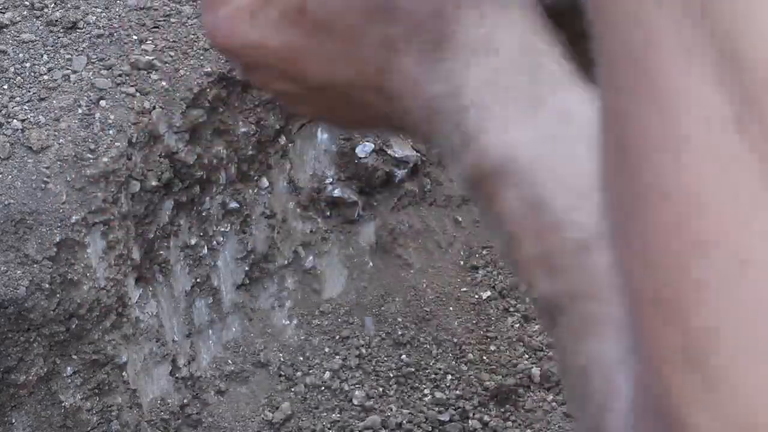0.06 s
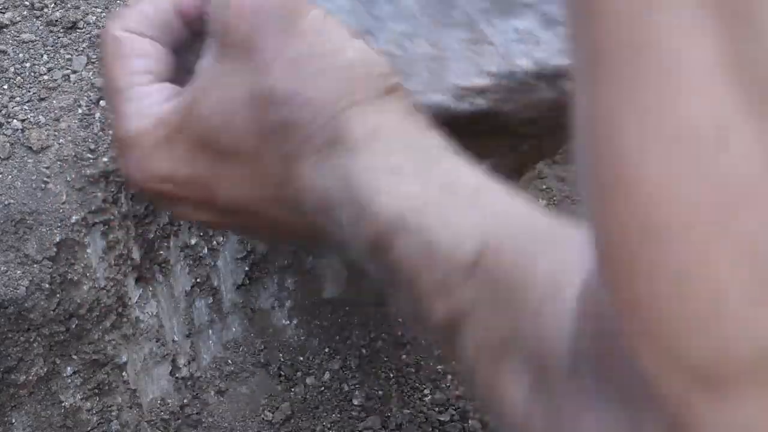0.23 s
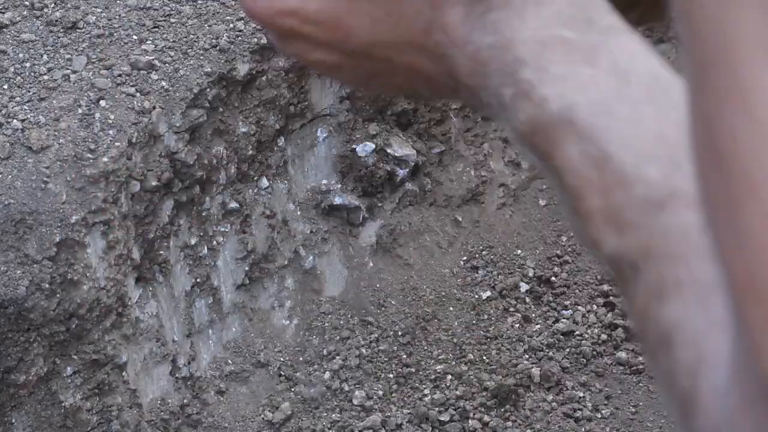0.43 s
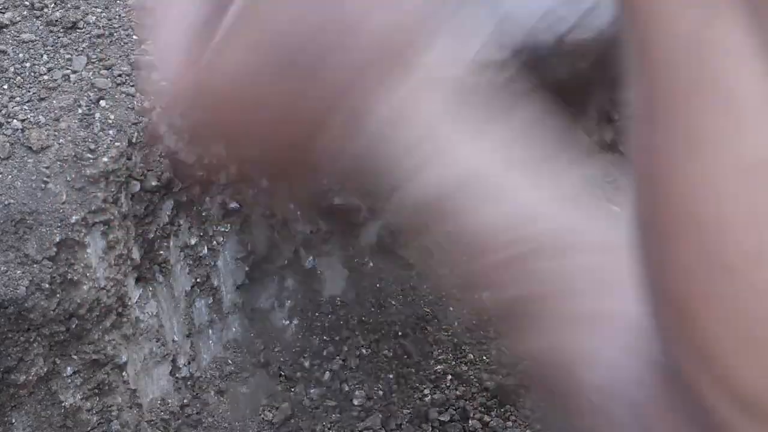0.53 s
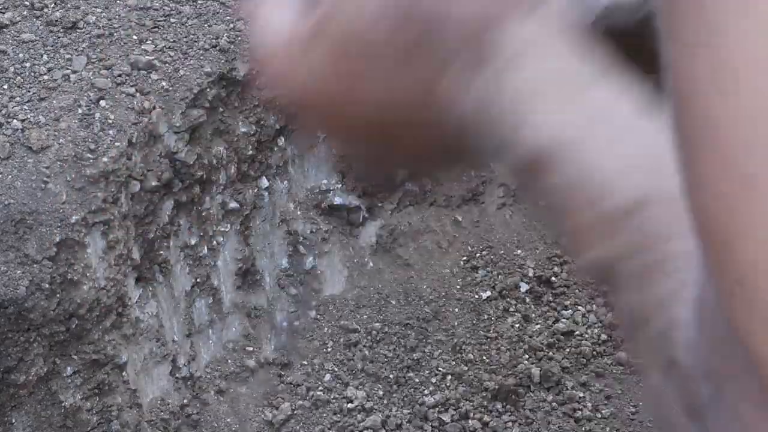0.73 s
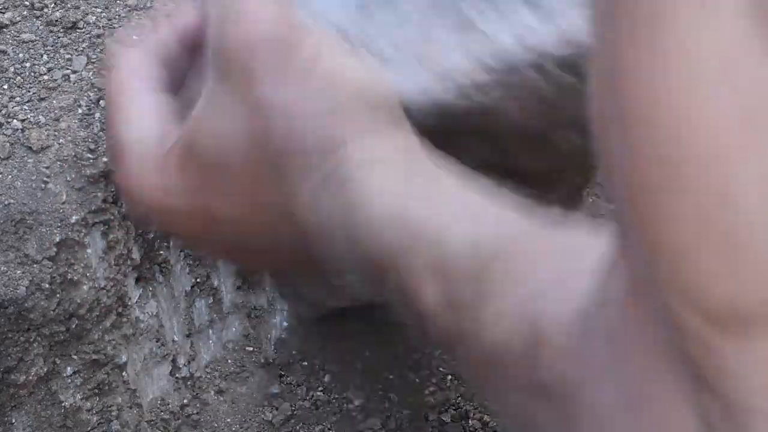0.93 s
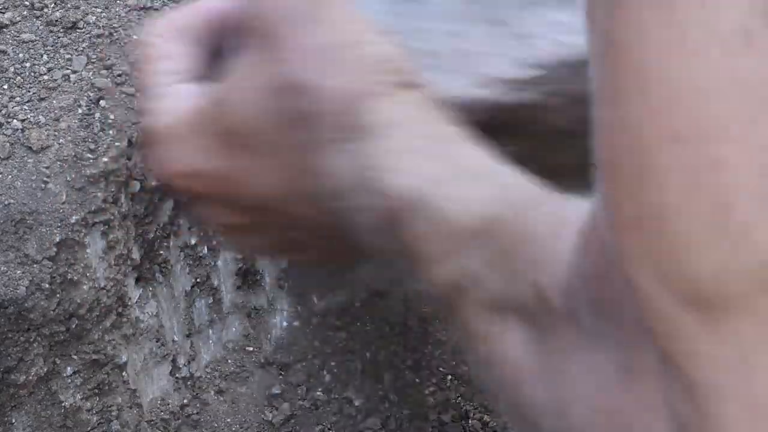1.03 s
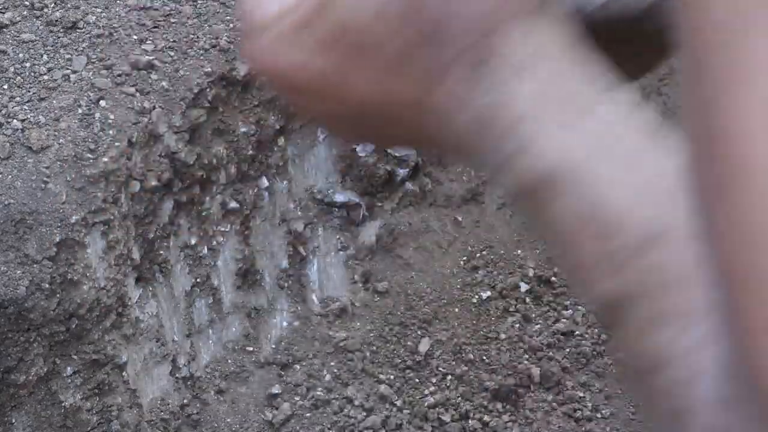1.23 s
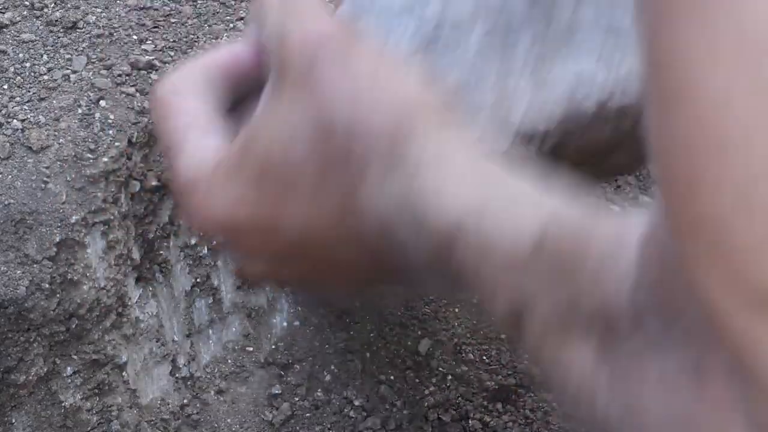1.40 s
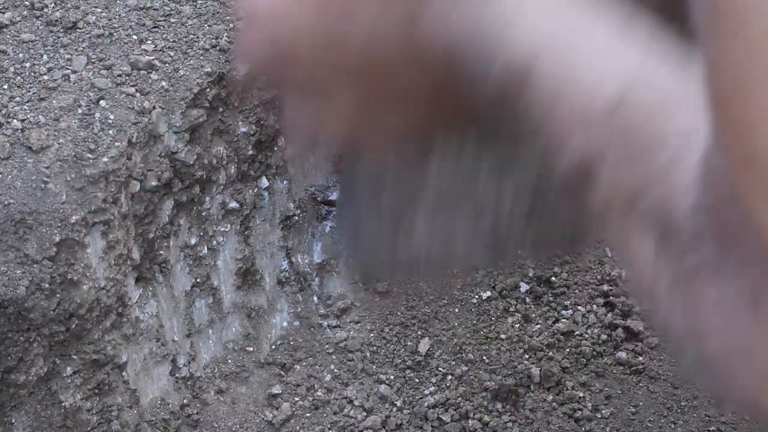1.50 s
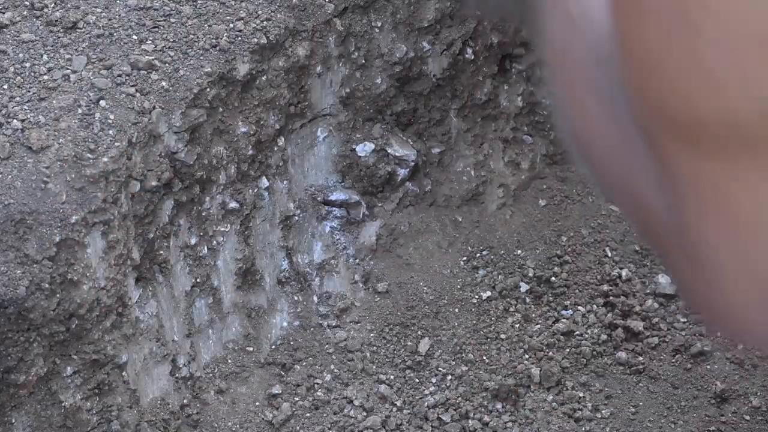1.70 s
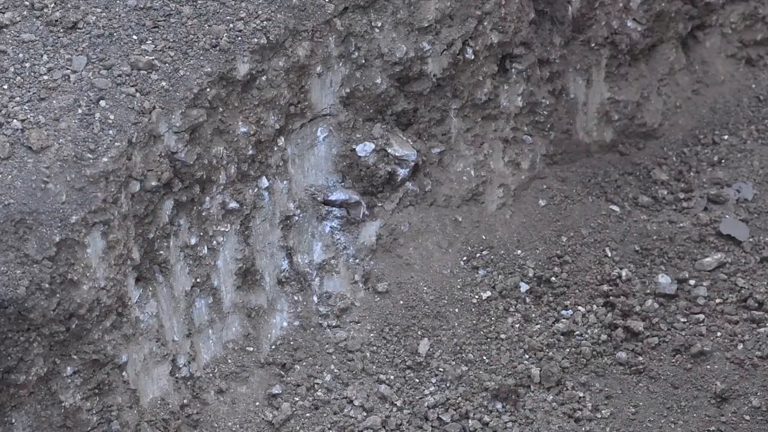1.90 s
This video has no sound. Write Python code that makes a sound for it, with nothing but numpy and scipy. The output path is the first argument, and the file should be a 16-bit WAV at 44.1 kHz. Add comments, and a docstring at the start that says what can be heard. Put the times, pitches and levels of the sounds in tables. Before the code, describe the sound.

A hand-held stone pounds hard, gravelly earth four times at a steady pace, close by outdoors. Each blow crunches and lands with a dull knock and low thud, followed by a faint patter of loose grit.

```python
"""The low shudder of an earlier blow dies away, leaving quiet air and a faint rumble. Close by, a
hand-held stone is pounded four times into hard, gravelly earth. Each blow crushes grit and cracks
single stones, then seats with a dull knock and a low shudder of the ground. Loose grit and pebbles
land afterwards, and a soft scuff leads into the next blow. At the end the stone is lifted away with
a faint scrape."""
import sys
import numpy as np
from scipy import signal
from scipy.fft import rfft, irfft
from scipy.io import wavfile

SR = 44100
rng = np.random.default_rng(int(sys.argv[2]) if len(sys.argv) > 2 else 0)


def persist_wave(psi):
    """Save psi, clipped to +-1, as 16-bit WAV."""
    counts = np.round(np.clip(psi, -1, 1) * 32767).astype(np.int16)
    wavfile.write(sys.argv[1], SR, np.atleast_2d(counts).T)


N = 85995

# The stone bites into gravel. Each row: start in seconds, crunch level in dB, crushing time and t60
# in seconds, low-mid, presence and treble EQ in dB, jolt level in dB.
BLOWS = [(0.1996, -26, 0.0031, 0.053, 1, -1, 1.5, -24), (0.596, -29, 0.025, .035, 0, 4, 0.5, -22),
         (0.9712, -17, 0.0029, 0.032, 3.5, 7, -1, -24), (1.3576, -18.5, 0.0032, 0.032, -4, 2, -1, -35)]
# The ground takes the weight. Each row: start in seconds, boom, thump and upper thump EQ in dB,
# a factor on the ring time, left-minus-right balance in dB.
THUDS = [(0.203, 7.5, -0.5, -1.5, 1.24, -2), (0.6242, -1.5, 5.5, -6.5, 1.08, 0.5),
         (0.9826, 0.5, 3, -5.5, 1.1, 1), (1.3642, 8.5, -4, -3.5, 1.165, 0)]

TIME = np.arange(N) / SR
BIN_HZ = np.fft.rfftfreq(4096, 1 / SR)


def undb(db):
    return 10 ** (np.asarray(db) / 20)


def on_log(hz, points):
    """Read an EQ curve of (Hz, dB) points on a log-frequency axis."""
    f, db = np.array(points, float).T
    return np.interp(np.log(np.maximum(hz, 1)), np.log(f), db)


def colour(x, db):
    """Minimum-phase EQ of unit power: db sets only the shape, one value for each of BIN_HZ."""
    cepstrum = irfft(np.log(undb(db)))
    half = len(cepstrum) // 2
    cepstrum[1:half] *= 2
    cepstrum[half + 1:] = 0
    impulse = irfft(np.exp(rfft(cepstrum)))
    return signal.fftconvolve(x, impulse / np.sqrt(np.sum(impulse ** 2)))[:N]


def since(start):
    return np.maximum(TIME - start, 0)


def burst(start, rise, hold, t60):
    """Linear attack; the exponential release begins hold seconds after the start."""
    t = since(start)
    return np.minimum(t / rise, 1) * np.exp(-np.log(1000) * np.maximum(t - hold, 0) / t60)


def swells(rows):
    """Bell-shaped fades. Each row: centre and half length in seconds, peak level in dB."""
    return sum(undb(db) * np.exp(-.5 * ((TIME - centre) / half) ** 2) for centre, half, db in rows)


def grains(per_s, spread_db):
    """Random clicks of uneven size, rms 1."""
    size = undb(spread_db * np.minimum(rng.exponential(size=N), 4)) * rng.choice([-1, 1], N)
    clicks = size * (rng.random(N) < per_s / SR)
    return clicks / clicks.std()


def stereo_noise(eq, likeness):
    """Coloured noise, from fully wide at likeness 0 to mono at 1."""
    common = np.sqrt(likeness) * rng.standard_normal(N)
    channels = [common + np.sqrt(1 - likeness) * rng.standard_normal(N) for _ in range(2)]
    return np.array([colour(noise, on_log(BIN_HZ, eq)) for noise in channels])


def air_and_rumble():
    """The low shudder of an earlier blow dies away at the start, leaving quiet air and a faint rumble."""
    # Tone of the air and of the rumble. Each row: frequency in Hz, relative level in dB.
    air_eq = [(100, 1.5), (300, -6), (450, -7), (1000, -14.5), (2000, -18), (3300, -21.5), (9000, -23.5),
              (16000, -25)]
    rumble_eq = [(15, -27.5), (30, -6), (52, 5.5), (110, -17.5), (200, -26), (500, -46.5), (2000, -78.5)]
    # The earlier blow's tail sinks to a faint rumble. Each row: time in seconds, level in dB.
    rumble_levels = [(0, -38), (.15, -55.5), (.5, -59.5), (.9, -58.5), (1.551, -58), (1.722, -64),
                     (1.95, -71.5)]
    rumble_gain = undb(np.interp(TIME, *np.array(rumble_levels).T))
    air = undb(-62.5) * stereo_noise(air_eq, likeness=0.22)
    return air + rumble_gain * stereo_noise(rumble_eq, likeness=0)


def scuffs():
    """The stone scrapes softly as it is moved between blows and lifted away."""
    # The hand's moves. Each row: centre and half length in seconds, level in dB.
    moves = [(.54, 0.016, -60.5), (.918, 0.0073, -61.5), (1.308, 0.0063, -59), (1.885, 0.01, -62)]
    # Tone of the scrape. Each row: frequency in Hz, relative level in dB.
    scuff_eq = [(100, -9), (350, 0.5), (700, -16.5), (1300, -14), (3000, -26), (8000, -35)]
    return colour(swells(moves) * rng.standard_normal(N), on_log(BIN_HZ, scuff_eq))


def loose_grit():
    """Loose grit lands in small showers of dense clicks."""
    # The showers. Each row: centre and half length in seconds, level in dB.
    showers = [(0.288, 0.047, -65.5), (0.35, 0.0061, -64.5), (0.666, 0.021, -59), (0.997, 0.017, -58),
               (1.084, 0.017, -62), (1.437, 0.019, -64.5), (1.498, 0.014, -63.5), (1.81, 0.12, -69.5),
               (1.886, 0.0095, -66.5)]
    # Tone of the landing grit. Each row: frequency in Hz, relative level in dB.
    grit_eq = [(200, -11.5), (1200, -9.5), (1750, 2), (2300, 0.5), (3500, -11), (5500, -8.5), (11000, -9),
               (16000, -18)]
    return colour(swells(showers) * grains(per_s=4900, spread_db=2), on_log(BIN_HZ, grit_eq))


def pebbles():
    """Single pebbles land, each with a noisy tick and a very brief ring."""
    # The landings. Each row: start in seconds, level in dB, pitch in Hz, t60 in seconds.
    landings = [(.2602, -61, 8500, 0.01), (0.2827, -57.5, 9700, 0.0071), (0.3073, -54, 1660, .03),
                (0.307, -59.5, 7600, 0.016), (0.337, -78, 1850, 0.074), (.6617, -48, 2060, 0.024),
                (.674, -47.5, 6170, 0.0073), (.696, -59.5, 3300, 0.016), (1.448, -55, 1470, 0.042),
                (1.7449, -54, 1806, 0.031), (1.777, -61.5, 1840, 0.03), (1.877, -57.5, 2380, 0.06)]
    out = 0
    for start, db, hz, t60 in landings:
        octaves_off = np.log2(np.maximum(BIN_HZ, 1) / hz)
        band_db = -10 * np.log10(1 + (octaves_off / 0.45) ** 4)
        fade = burst(start, rise=0.00043, hold=0.0004, t60=t60)
        tick = colour(rng.standard_normal(N) * fade, band_db)
        ring = np.sin(2 * np.pi * hz * since(start)) * fade
        out += undb(db) * (tick + ring)
    return out


def soil():
    """Packed earth rumbles briefly after each blow: the diffuse part of the thud."""
    # Tone of the earth. Each row: frequency in Hz, relative level in dB.
    soil_eq = [(30, -17.5), (60, 2), (160, 4), (260, -10), (420, -18.5), (700, -28), (2000, -54.5)]
    fade = sum(burst(start, rise=.004, hold=0.024, t60=0.19 * length) for start, *_, length, _ in THUDS)
    return undb(-33) * fade * stereo_noise(soil_eq, likeness=0.44)


def shudder():
    """Low modes of the ground and what stands on it swell and die, differently left and right."""
    # The modes. Each row: frequency in Hz, base level in dB, base t60 in seconds,
    # left-minus-right balance in dB, phase lead of the left side in radians.
    modes = [(43.9, -33, 0.44, -2.5, 2.2), (61.9, -19.5, 0.35, -3.5, 3.1), (98.7, -33.5, 0.42, 7, 1.6),
             (112.65, -14.5, 0.23, -2.5, 1.9), (144.8, -8.5, 0.11, -3, 0.61),
             (175.75, -21, 0.17, -3.5, 0.4), (218.5, -32, 0.13, 7.5, .4), (245.5, -39, 0.13, 17.5, 0.44)]
    side = np.array([[.5], [-.5]])
    out = np.zeros((2, N))
    for start, boom_db, thump_db, upper_db, length, balance_db in THUDS:
        t = since(start)
        thud_eq = [(62, boom_db), (115, thump_db), (145, upper_db), (200, 1)]
        bloom = 1 - np.exp(-t / 0.0096)
        for k, (hz, db, t60, pan_db, lead) in enumerate(modes):
            gain = undb(db + on_log(hz, thud_eq))
            ring = gain * bloom * burst(start, rise=0.0024, hold=0, t60=t60 * length)
            detune = 1 + 0.0054 * rng.standard_normal()
            phase = 2 * np.pi * hz * detune * t + np.pi * k  # modes alternate in polarity
            out += ring * undb(side * (pan_db + balance_db)) * np.sin(phase + side * lead)
    return out


def jolts():
    """A short, low push while the stone is still biting."""
    pitch_hz, length_s = 107.3, 0.024
    out = 0
    for start, *_, db in BLOWS:
        t = since(start)
        arch = np.sin(np.pi * np.minimum(t / length_s, 1))
        out += undb(db) * np.sin(2 * np.pi * pitch_hz * t) * arch
    return out


def knocks():
    """The stone seats against packed earth with a dull, heavily damped knock."""
    # The stone comes to rest. Each row: start in seconds, level in dB, pitch in Hz.
    seatings = [(0.209, -25.5, 343), (0.6262, -28, 310), (.9745, -22, 269.2), (0.9838, -19.5, 210.3),
                (1.3642, -17, 312)]
    # Partials of the knock. Each row: multiple of the pitch, relative level in dB, t60 in seconds.
    partials = [(.6, -5, 0.055), (1.0, 2.5, 0.044), (1.22, -12.5, 0.069), (2.15, -20, 0.037)]
    out = 0
    for start, knock_db, hz in seatings:
        for ratio, db, t60 in partials:
            fade = burst(start, rise=0.0012, hold=0.0014, t60=t60)
            out += undb(knock_db + db) * np.sin(2 * np.pi * ratio * hz * since(start)) * fade
    return out


def gravel_colour():
    """Tone of breaking gravel with the short resonances of the stone, in dB for each of BIN_HZ."""
    # Tone of crushed grit. Each row: frequency in Hz, relative level in dB.
    crush_eq = [(60, -3.5), (250, 3), (480, -1.5), (800, -3.5), (1100, -9.5), (2200, -9.5), (4500, -21.5),
                (8000, -16.5), (12500, -24), (16000, -35)]
    # Resonances of stone and gravel. Each row: centre and width in Hz, boost or cut in dB.
    resonances = [(702, 170, 4.5), (1007, 95, 5.5), (1340, 150, 4.5), (1947, 260, 5), (2366, 90, -2),
                  (2832, 150, 7), (3727, 470, 7.5), (5694, 500, 6.5), (6900, 1100, 5), (11520, 400, 8.5)]
    peaks_db = sum(db / (1 + (2 * (BIN_HZ - hz) / width) ** 2) for hz, width, db in resonances)
    return on_log(BIN_HZ, crush_eq) + peaks_db


def cracks():
    """Single stones fracture under the blow: a click that rings the stone, and a spray of splinters."""
    # The fractures. Each row: start in seconds, level in dB, treble EQ in dB.
    fractures = [(.2012, -20.5, 0), (0.2054, -33, 22), (0.5978, -21.5, -5), (0.6081, -22.5, 7),
                 (0.616, -32, 0), (.9702, -12.5, 2), (.9724, -13.5, 3.5), (1.3587, -20, 12)]
    out = 0
    for start, db, treble_db in fractures:
        snap = undb(-3.5) * rng.standard_normal(N) * burst(start, rise=.0001, hold=0.00049, t60=0.01)
        snap[int(start * SR)] -= 4.03  # the clean click ahead of the splinters
        tone = on_log(BIN_HZ, [(400, -5), (900, -2), (2500, 2), (7000, treble_db)])
        out += undb(db) * colour(snap, gravel_colour() + tone)
    return out


def crunch():
    """Grit is crushed under the stone in a dense burst of clicks; the pit answers with a faint tail."""
    rise_s = 0.00033
    out = 0
    for start, db, hold, t60, low_db, presence_db, treble_db, _ in BLOWS:
        grit = grains(per_s=7000, spread_db=3.0) * burst(start, rise_s, hold, t60)
        tail = undb(-36) * rng.standard_normal(N) * burst(start, rise_s, hold, t60=0.31)
        tone = on_log(BIN_HZ, [(600, low_db), (2400, presence_db), (8000, treble_db)])
        out += undb(db) * colour(grit + tail, gravel_colour() + tone)
    return out


def place(x):
    """Sound from the pit arrives on the left first; reflections off arm and pit wall add width."""
    # Stereo lean. Each row: frequency in Hz, left-minus-right balance in dB.
    balance = [(250, 2), (500, -0.5), (1000, -1.1), (2200, -1), (4200, 2), (8000, -4.5), (12000, 1.6)]
    left_lead_s = 1.8e-5
    hz = np.fft.rfftfreq(N, 1 / SR)
    tilt = undb(on_log(hz, balance) / 2)
    reflections = rng.standard_normal(N) * burst(0, rise=.001, hold=0, t60=.012)
    side = undb(-21) * rfft(reflections / np.sqrt(np.sum(reflections ** 2)))
    left = np.exp(2j * np.pi * hz * left_lead_s) * tilt + side
    right = 1 / tilt - side
    return irfft(rfft(x) * np.array([left, right]), N)


def scene():
    """Close-up hits and debris in the pit, over the ground's low end and quiet air."""
    pit = crunch() + cracks() + jolts() + knocks() + loose_grit() + scuffs() + pebbles()
    return place(pit) + shudder() + soil() + air_and_rumble()


def record(dry):
    """A steep high cut at 16 kHz."""
    return signal.sosfilt(signal.ellip(8, .2, 80, 16000, fs=SR, output="sos"), dry)


dry = scene()
out = record(dry)
persist_wave(out)
```